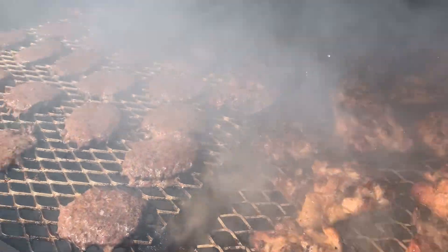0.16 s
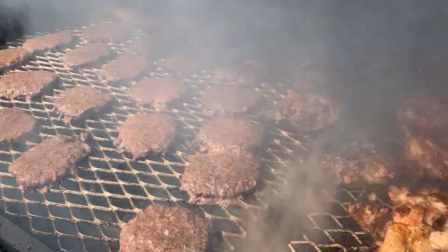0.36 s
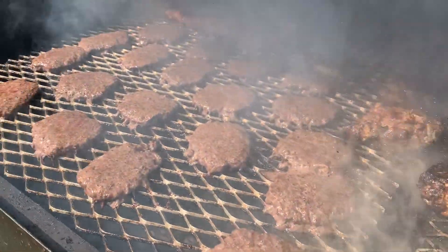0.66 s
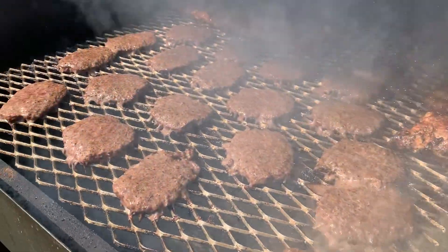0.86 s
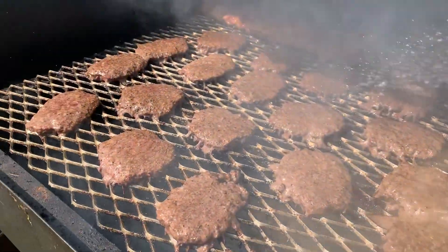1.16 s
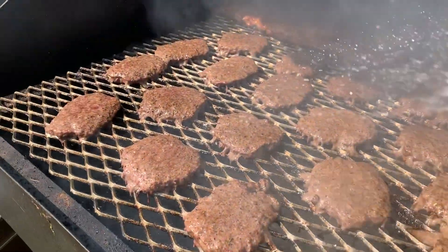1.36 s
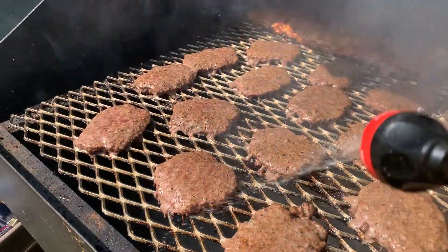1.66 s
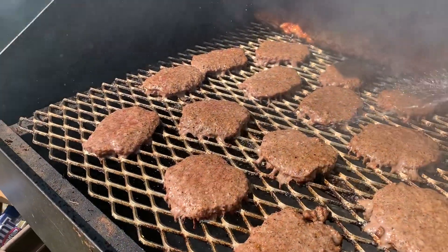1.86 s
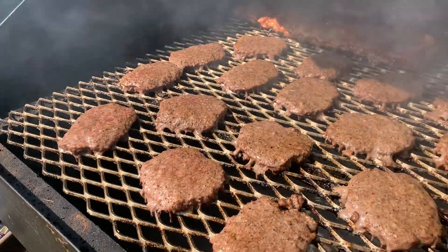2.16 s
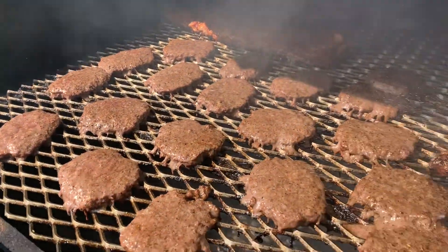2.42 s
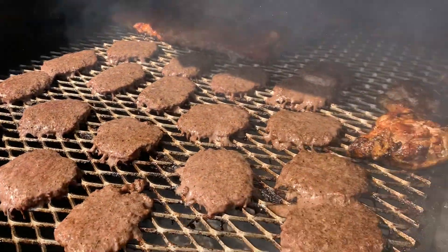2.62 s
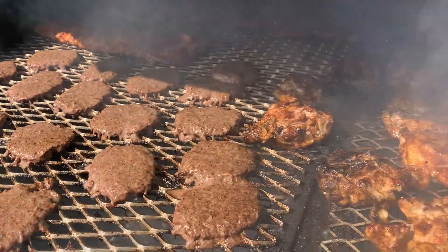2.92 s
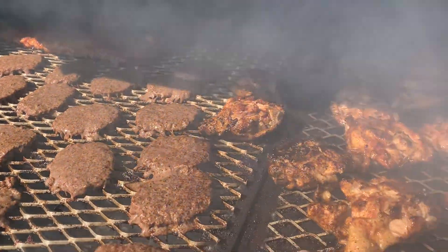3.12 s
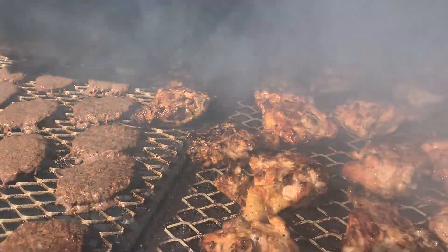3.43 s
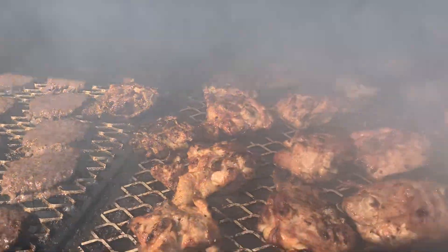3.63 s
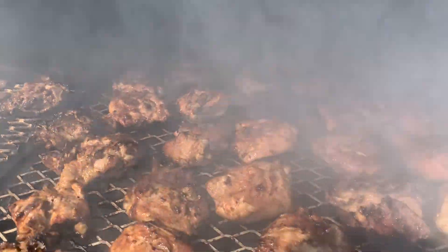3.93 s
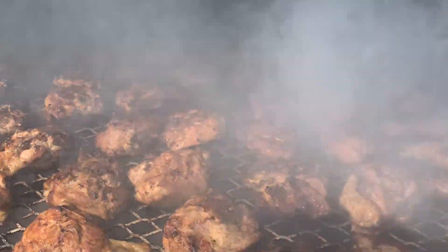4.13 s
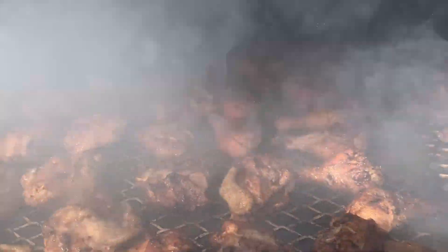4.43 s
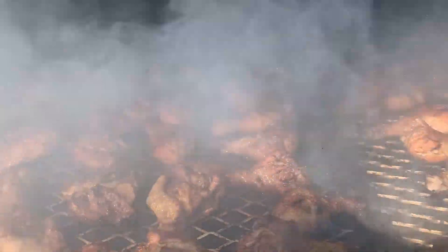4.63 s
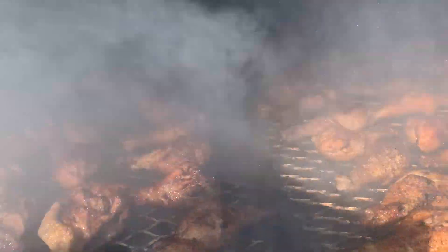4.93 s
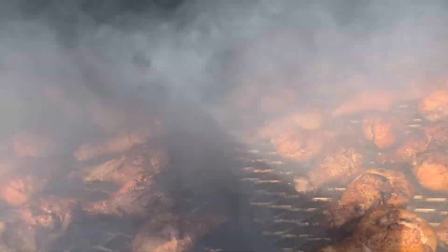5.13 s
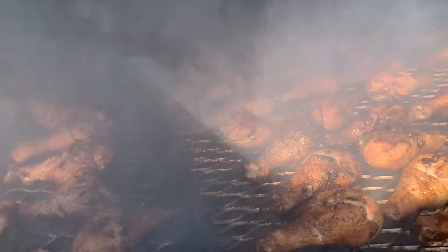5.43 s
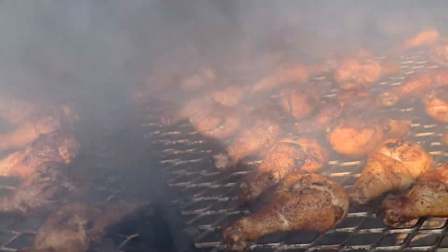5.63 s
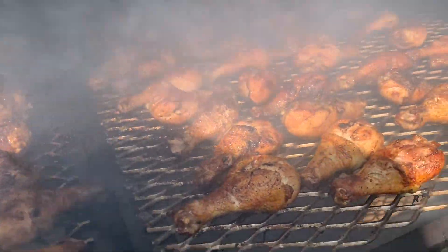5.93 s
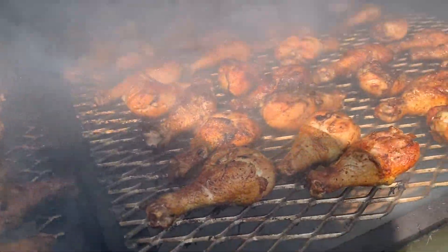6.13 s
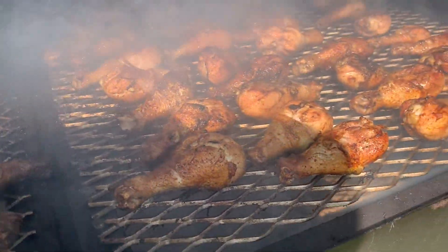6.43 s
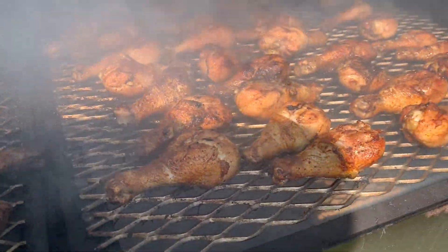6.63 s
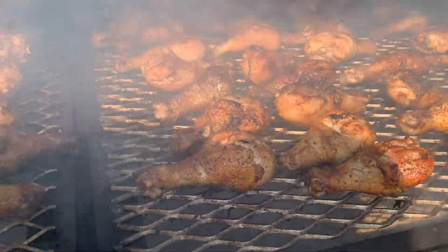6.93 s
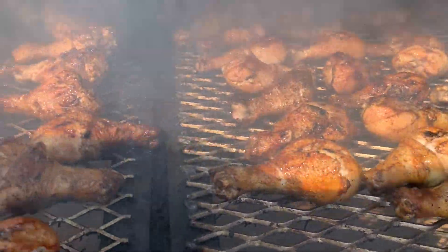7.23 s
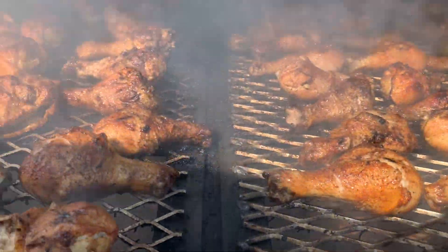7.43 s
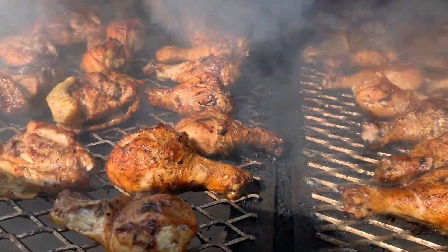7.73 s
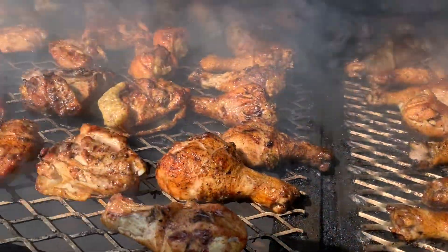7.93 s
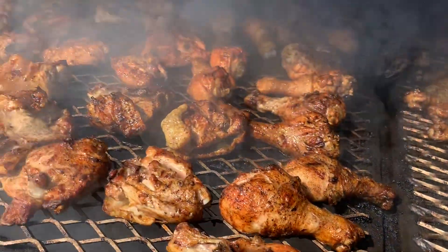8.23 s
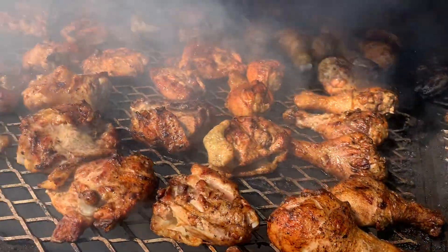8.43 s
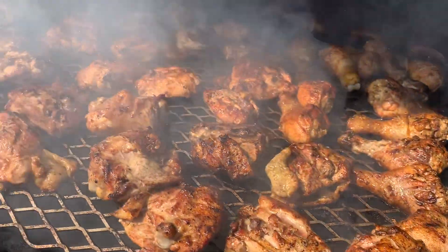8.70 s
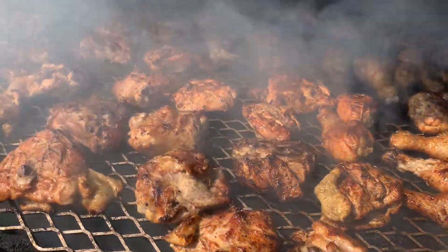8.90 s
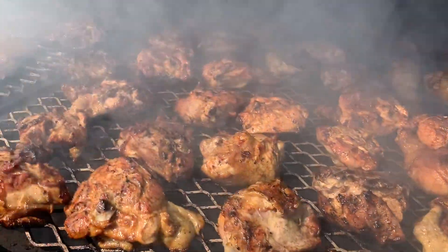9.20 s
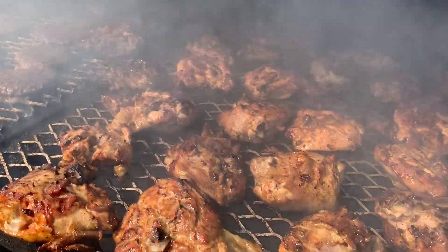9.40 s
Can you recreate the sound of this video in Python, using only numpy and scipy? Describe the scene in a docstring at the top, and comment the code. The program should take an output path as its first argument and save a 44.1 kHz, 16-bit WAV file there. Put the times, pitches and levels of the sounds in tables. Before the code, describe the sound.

Outdoors, very close to burgers and chicken on a wide charcoal grill, a dense bright sizzle runs throughout: countless tiny bubble bursts over airy hiss. It is loudest in the first second, surging in rapid squirts of steam at about 0.5, 0.9 and 1.1 s, then falls near 2 s. Smaller swells follow between 2.1 and 3.3 s, with a clear hiss at 4.5 s. From 5 to 7.4 s it is calmer, then rises modestly around 8.5 s. Dull, whistling bands of steam drift through it. Sharp, tiny fat spits click at 3.3, 4.9 and 5.7 s, clustering most strongly at 7.1-7.6 s and continuing sparsely. Soft grill knocks fall near 2.8, 5.1, 5.5, 6.4 and 8.5 s. Two faint motors hum low, swelling around 3, 7.5 and 9 s. Light wind rumbles and thumps the moving handheld stereo microphone, especially around 2.8, 7.4, 8.3 and 9 s.

```python
"""First comes a dense, bright sizzle: meat on a wide charcoal grill in the open, many bubble bursts over hiss.
Sprayed liquid flashes to steam on the hot mesh in quick swells; jets of steam, gliding bands of noise, whistle
dully. Fat spits in ringing clicks and short noise bursts tap the grill. Two small motors nearby hum as sine
lines, and a light wind buffets the hand-held microphone pair with low noise and short thumps. The pair swings
along the grill, so the sizzle reaches the left microphone by a changing detour."""
import sys
import numpy as np
from scipy import signal
from scipy.fft import rfft, irfft, next_fast_len
from scipy.io import wavfile
from scipy.ndimage import uniform_filter1d, map_coordinates

SR = 44100
rng = np.random.default_rng(int(sys.argv[2]) if len(sys.argv) > 2 else 0)


def generate_wav(signal):
    """Clip the signal to [-1, 1] and save it as 16-bit WAV at the path in sys.argv[1]."""
    frames = np.transpose(np.atleast_2d(signal))
    scaled = np.clip(frames, -1, 1) * 32767
    pcm = np.round(scaled).astype(np.int16)
    wavfile.write(sys.argv[1], SR, pcm)


N = 421596   # length [samples]
LEFT_RIGHT_HALVES = np.array([[.5], [-.5]])   # splits a left-minus-right level between the microphones


def amp(db):
    """Decibels to gain."""
    return 10 ** (np.asarray(db) / 20)


def rms_one(x):
    """Scale to unit rms."""
    return x / np.sqrt(np.mean(x ** 2) + 1e-20)


def in_time(rows):
    """Table columns as curves, one value a sample."""
    s, *columns = np.transpose(rows)
    return [np.interp(np.arange(N) / SR, s, column) for column in columns]


def at_hz(points, hz):
    """Read a table on a log-frequency axis."""
    table_hz, values = np.array(points)[:, 0], np.array(points)[:, 1]
    return np.interp(np.log(hz), np.log(table_hz), values)


def humps(crests_s, heights, rise_s, fall_s):
    """Sum of bell-shaped swells, one value a sample."""
    t = np.arange(0, N + 64, 64) / SR
    since = t[:, None] - crests_s
    width_s = np.where(since < 0, rise_s, fall_s)
    bells = np.exp(-(since / width_s) ** 2) @ heights
    return np.interp(np.arange(N) / SR, t, bells)


def drift(rate_hz):
    """Slow chance: coarse noise through a double one-pole low-pass; spread 1."""
    r = np.exp(-2 * np.pi * rate_hz * 40 / SR)   # one coarse step is 40 samples
    coarse = rng.standard_normal(N // 40 + 2002)
    slow = signal.lfilter([1], [1, -2 * r, r * r], coarse)[2000:]
    return np.interp(np.arange(N) / 40, np.arange(len(slow)), rms_one(slow))


def ring(x, hz, t60):
    """A resonance: a unit click sets a sine of starting height 1 ringing, 60 dB down after t60 seconds."""
    r, w = amp(-60 / (t60 * SR)), 2 * np.pi * hz / SR
    return signal.lfilter([0, np.sin(w)], [1, -2 * r * np.cos(w), r * r], x + 1e-18)


# centres of seething, fizz, steam and mist: [Hz]
LAYER_CENTRES = [1400, 4200, 9500, 14000]


def sizzle():
    """Bubbles on the hot mesh seethe, fizz and steam: half-octave bands swell and flicker separately."""
    size = next_fast_len(N)
    hz = np.maximum(np.fft.rfftfreq(size, 1 / SR), 1)
    pair = sizzle_at_microphones(size, hz)
    still_rms = np.sqrt(2 * np.sum(abs(pair) ** 2) / len(pair)) / size
    pair = pair.astype(np.complex64)
    swell_db, steam_mean_db = sizzle_swells()
    together = drift(11.0)
    low_flicker_db = 4.5   # in the lowest band; larger bubbles come fewer, so low bands flicker more
    octaves = np.log2(hz / 300)
    layer_octaves = np.log2(np.array(LAYER_CENTRES) / 300)
    out = 0
    for k in range(13):   # overlapping half-octave bands that sum to one
        share = np.clip(1 - abs(2 * octaves - k), 0, 1).astype(np.float32)
        band = irfft(pair * share, size)[:, :N]
        weights = [np.interp(k / 2, layer_octaves, one_layer) for one_layer in np.eye(4)]
        patches_db = 0.37 * together + .5 * drift(20.0)
        flicker_db = amp(-2.5 * k) * low_flicker_db * drift(32)
        out = out + band * amp(weights @ swell_db + patches_db + flicker_db)
    return out * amp(steam_mean_db + 4.5) / still_rms


# swing of the microphones: (time [s], lag at the left one [ms])
SWING_LAG = [(0, .22), (.4, .27), (1.2, .34), (1.9, .4), (2.2, .385), (2.66, .29), (3.2, .23), (3.5, .21),
             (4.2, .24), (4.45, .29), (4.72, .23), (5.2, .23), (5.35, .045), (7.05, .04), (7.3, .27),
             (8.2, .27), (8.9, .31), (9.56, .34)]
# how far one spot of the grill rules the detoured sizzle, against many scattered ones: (time [s], share [0-1])
SPOT_FOCUS = [(0, .9), (.4, 1), (1.3, 1), (1.7, .75), (2.2, .9), (2.6, 1), (3.3, .95), (3.6, .3),
              (4.05, .4), (4.3, 1), (4.78, 1), (4.9, .5), (5.3, .15), (5.5, .55), (6.9, .55), (7.15, .2),
              (7.6, .85), (8.3, .85), (8.7, .7), (9, .35), (9.56, .4)]
# phase by which the housing turns the left microphone against the right: (frequency [Hz], phase [rad])
HOUSING_PHASE = [(300, 6.3), (500, 4.7), (900, 5.1), (1150, 4.8), (1450, 2.1), (1750, 1.5), (2040, .5),
                 (2060, 1.5), (2300, 1.4), (2800, .7), (4400, .5), (5500, -.6), (7300, -2.7), (7700, 0),
                 (11500, 0), (12600, -.3), (13500, -.7), (14500, -1), (16000, -1.4)]
# share of the sizzle that comes from the common stream: (frequency [Hz], likeness [0-1])
SHARED_PART = [(300, .7), (500, .45), (700, .2), (900, .4), (1150, .25), (1450, .3), (1750, .5),
               (2000, .35), (2250, .97), (3000, .96), (3600, .75), (4600, .4), (5500, .25), (7100, .2),
               (7800, .93), (9000, .97), (11500, .97), (12600, .83), (13500, .72), (14500, .66),
               (16000, .67)]
# colour of the sizzle: (frequency [Hz], relative level per Hz [dB])
SIZZLE_COLOUR = [(180, -47), (300, -17.5), (385, -24.5), (469, -23.5), (510, -18.5), (582, -22.5),
                 (988, -13.5), (1470, -12.5), (1950, -8.5), (2450, -7), (2950, -6), (3540, -6),
                 (4700, -5.5), (5400, -6.5), (6200, -6), (7090, -5.5), (8200, -4.5), (10400, -1),
                 (12300, -3.5), (14000, -1.5), (15700, -2)]
# lean of the sizzle to one side: (frequency [Hz], left minus right [dB])
SIZZLE_LEAN = [(60, 1.0), (120, 1.5), (240, 6), (480, -7.5), (950, -3.5), (1890, -1), (2400, 2),
               (3000, -0.3), (3770, 0.5), (4800, 1), (5900, 2.5), (7520, 0), (15000, 0)]
LAG_LOW_HZ, LAG_TOP_HZ = 2050, 7500   # the detour acts between these


def sizzle_at_microphones(size, hz):
    """Spectra at left and right: one shared bubble stream, detoured to the left, and a private one at each."""
    shared, left, right = (bursting(6000, 1.85, 3.1) for _ in range(3))
    lag_ms, = in_time(SWING_LAG)
    late = map_coordinates(shared, [np.arange(N) - lag_ms * SR / 1000], order=3, mode="mirror")
    focus, = in_time(SPOT_FOCUS)
    late = focus * late + np.sqrt(1 - focus ** 2) * rng.standard_normal(N)
    shared, late, left, right = (rfft(x, size) for x in (shared, late, left, right))
    detoured = (hz > LAG_LOW_HZ) & (hz < LAG_TOP_HZ)
    at_left = np.where(detoured, late, shared) * np.exp(1j * at_hz(HOUSING_PHASE, hz))
    alike = np.clip(at_hz(SHARED_PART, hz), 0, 1)
    pair = np.sqrt(alike) * np.array([at_left, shared])
    pair += np.sqrt(1 - alike) * np.array([left, right])
    colour_db = at_hz(SIZZLE_COLOUR, hz) + at_hz(SIZZLE_LEAN, hz) * LEFT_RIGHT_HALVES
    return pair * amp(colour_db) * (hz > 250)


def bursting(per_s, spread_db, hiss_db):
    """Steam bubbles burst as clicks of very uneven size, in clumps, over a smooth hiss; flat spectrum."""
    sizes = amp(spread_db * np.minimum(rng.exponential(1, N), 6)) * rng.choice([-1, 1], N)
    born = rng.random(N) < per_s * amp(2.5 * drift(40)) / SR
    return rms_one(rms_one(sizes * born) + amp(hiss_db) * rng.standard_normal(N))


# sizzle under the squirts; the mean of the steam sets the overall level, the others give only changes:
# (time [s], steam 7.5-12 kHz [relative dB], seething 0.7-2.5 kHz [relative dB], fizz 2.5-7 kHz [relative dB])
SIZZLE_LEVELS = [(0, -27, -47, -38), (.3, -24.5, -45, -37.5), (.55, -27.5, -46.5, -38),
                 (.75, -25.5, -46, -39), (.95, -28.5, -49.5, -40), (1.5, -33.5, -51, -40),
                 (1.95, -35.5, -53.5, -42.5), (2.15, -34.5, -52, -39.5), (2.8, -30.5, -48.5, -39),
                 (3.2, -30, -48, -39.5), (3.45, -32.5, -49.5, -41), (3.9, -33.5, -50.5, -39.5),
                 (4.4, -29, -48, -39.5), (5.3, -34.5, -50.5, -44), (5.85, -35.5, -51, -44),
                 (7, -35.5, -50.5, -43.5), (7.4, -34, -49, -42), (7.7, -35, -49, -42), (8.5, -31, -49, -39),
                 (9.1, -34.5, -48, -38.5), (9.56, -34, -47.5, -36)]
# the finest mist against the steam, only its changes count: (time [s], relative level [dB])
MIST_LEVEL = [(0, 0.4), (2.5, 1), (3.1, 0.5), (4.45, 1), (5, 0.5), (6.2, -1), (7.4, 0.5), (7.6, -3),
              (8.4, -1), (9.56, 2)]
# squirts of liquid flashing to steam: (crest time [s], rise before the layer's share [dB])
SQUIRT_CRESTS = [(.17, 0.5), (.54, 4), (.74, 2), (.92, 3.5), (1.12, 3), (1.32, 2.5), (2.13, 2.5),
                 (2.38, 2.5), (2.61, 2), (2.96, 1.5), (3.28, 1), (4.22, 1), (4.47, 3.5), (5.66, 0.5),
                 (6.2, 0), (7.43, 0.5), (8.64, 0)]
# how much of a squirt shows in seething, fizz, steam and mist: [factor on the dB rise]
SQUIRT_SHARES = [.45, .8, 1.01, 1.3]
SQUIRT_RISE_S, SQUIRT_FALL_S = 0.072, 0.082


def sizzle_swells():
    """Level changes of the four layers [dB] as liquid flashes to steam, and the mean of the steam level."""
    steam_db, seething_db, fizz_db = in_time(SIZZLE_LEVELS)
    mist_db = steam_db + in_time(MIST_LEVEL)[0]
    levels_db = np.array([seething_db, fizz_db, steam_db, mist_db])
    swell_db = levels_db - levels_db.mean(axis=1, keepdims=True)
    squirts_db = humps(*np.transpose(SQUIRT_CRESTS), SQUIRT_RISE_S, SQUIRT_FALL_S)
    swell_db += np.outer(SQUIRT_SHARES, squirts_db)
    return swell_db, steam_db.mean()


# jets of steam from single pieces of meat, levels before flutter and mottle: (start [s], length [s],
# first centre [Hz], last centre [Hz], level before the microphones' own part [dB], left minus right [dB])
STEAM_JETS = [(-.3, 1.93, 3980, 3462, -44.5, 0), (2.003, 1.25, 3735, 3524, -48, -2),
              (3.197, 1, 3910, 4060, -56, -4), (4.203, 1.48, 3583, 3287, -52, -4),
              (5.55, 1.9, 3600, 3050, -46, 1), (7.4, 1.22, 4380, 4345, -47.5, -5),
              (7.399, 0.99, 2950, 2977, -56, -2), (8.051, 1.21, 3200, 3774, -43.5, 0),
              (9.1, 0.67, 3430, 3220, -50, .5)]
JET_WIDTH_HZ, JET_FADE_S = 670, 0.33
JET_OWN_DB = -2   # part that each microphone hears alone, against the shared part


def steam_jets():
    """Steam leaves the meat as fluttering noise in a band whose centre glides as the pressure changes."""
    out = np.zeros((2, N))
    low = signal.butter(4, JET_WIDTH_HZ / 2, fs=SR, output="sos")
    # each stream holds two noises that modulate cosine and sine carriers
    shared, *own = signal.sosfilt(low, rng.standard_normal((3, 2, N)))
    pair = rms_one(shared + amp(JET_OWN_DB) * np.array(own))
    for start_s, length_s, first_hz, last_hz, level_db, pan_db in STEAM_JETS:
        first, last = round(start_s * SR), round((start_s + length_s) * SR)
        part = slice(max(first, 0), min(last, N))
        since = np.arange(part.start, part.stop) / SR - start_s
        glide = (last_hz - first_hz) / length_s * since ** 2 / 2
        turn = 2 * np.pi * (first_hz * since + glide)
        fade = np.clip(np.minimum(since, length_s - since) / JET_FADE_S, 0, 1)
        gain = amp(level_db + pan_db * LEFT_RIGHT_HALVES) * fade
        out[:, part] += gain * (pair[:, 0, part] * np.cos(turn) + pair[:, 1, part] * np.sin(turn))
    return out * amp(2.0 * drift(28))


# depth of small spits and lulls: (frequency [Hz], spread before the microphones' own part [dB])
MOTTLE_DEPTH = [(600, -1.2), (1200, 1.5), (2500, 2.03), (5000, 1.5), (7500, 0.87), (12000, 0.5)]


def mottle(pair):
    """Patches a few hundred Hz wide, some 40 ms long, rise and sink, partly apart at each microphone."""
    hz, _, cells = signal.stft(pair, SR, nperseg=1024)
    field = rng.standard_normal((3,) + cells.shape[1:])
    for axis, size in ((1, 5), (1, 3), (2, 3), (2, 2)):   # smooth over frequency, then over time
        field = uniform_filter1d(field, size, axis=axis)
    field = rms_one(field[0] + 0.21 * field[1:])
    field = field * at_hz(MOTTLE_DEPTH, np.maximum(hz, 1))[:, None]
    return signal.istft(cells * amp(field), SR, nperseg=1024)[1][:, :N]


# fat spitting, the loudest: (time [s], relative level before the ringing [dB])
LOUD_SPITS = [(2.8067, -19), (3.2695, -14.6), (3.2893, -14), (4.9076, -15.7), (5.6402, -19), (5.6679, -16),
              (6.2263, -15), (6.567, -17), (6.9311, -18), (7.1105, -18), (7.1958, -17), (7.24, -18),
              (7.309, -18), (7.3347, -16.5), (7.3613, -15), (7.4128, -12), (7.4245, -16.2), (7.4592, -16),
              (7.5124, -10), (7.5636, -14), (7.7009, -17), (7.7562, -17), (7.8174, -16), (7.9376, -15),
              (8.163, -16), (8.6201, -14), (8.7243, -16), (8.8158, -16.3), (8.9183, -14), (9.0843, -15),
              (9.1667, -19), (9.4228, -16), (9.5173, -17)]
SMALL_SPITS, SMALL_SPIT_DB = 60, -24   # number of fainter ones, and the lowest relative level among them


def spits():
    """Fat bursts with a sharp crack that rings briefly near 12 kHz, a faint short spatter behind it."""
    clicks = np.zeros(N + 400)
    chance = rng.random((SMALL_SPITS, 2))
    small = [(when * N / SR, SMALL_SPIT_DB + 5 * size) for when, size in chance]
    every_spit = LOUD_SPITS + small
    fade = np.exp(-np.arange(400) / SR / .003)
    spatter = rng.standard_normal((len(every_spit), 400)) ** 3 * fade * .025
    spatter[:, 0] = 1.8   # the crack itself
    for (s, db), tail in zip(every_spit, spatter):
        i = round(s * SR)
        clicks[i:i + 400] += amp(db) * tail
    high = signal.butter(2, 6500, "high", fs=SR, output="sos")
    return signal.sosfilt(high, ring(clicks[:N], 12000, .0008))


# soft knocks on the grill: (time [s], peak before the lean to the right [dB], pitch [Hz])
GRILL_KNOCKS = [(2.781, -40, 847), (2.8, -38, 330), (5.118, -40, 1070), (5.494, -37, 1040),
                (6.446, -33, 1100), (8.477, -34.5, 900), (8.582, -34, 1000), (8.822, -39, 1083)]
KNOCK_BURST_S, KNOCK_TAIL_S, KNOCK_TAIL_DB = 0.0025, 0.02, -7
KNOCK_TICK_DB = -8   # against the ring at the pitch


def knocks():
    """Taps: a few ms of noise with a fainter tail, rung briefly at each pitch and in a broad tick above it."""
    out, t = np.zeros(N), np.arange(3000) / SR
    fade = np.exp(-t / KNOCK_BURST_S) + amp(KNOCK_TAIL_DB) * np.exp(-t / KNOCK_TAIL_S)
    bursts = rng.standard_normal((len(GRILL_KNOCKS), len(t))) * fade
    for (s, db, pitch_hz), burst in zip(GRILL_KNOCKS, bursts):
        body = rms_one(ring(burst, pitch_hz, .002))
        tick = rms_one(ring(burst, 2.2 * pitch_hz, .001))
        tap = body + amp(KNOCK_TICK_DB) * tick
        i = round(s * SR)
        out[i:i + len(t)] += amp(db) * tap / abs(tap).max()
    return out * amp([[-1.2], [1.2]])


MOTOR_HZ = 127.35
# lines of the steady motor: (multiple of MOTOR_HZ, left minus right [dB], resting rms level [dB])
MOTOR_LINES = [(2, 6.5, -74), (3, 9.5, -73.5), (4, -2, -72), (6, -1, -69), (7, 0.5, -67), (8, 1, -67),
               (9, 7, -76)]
# a line stands out for a while: (crest time [s], half length [s], multiple of MOTOR_HZ, rise [dB])
MOTOR_SWELLS = [(.5, 0.55, 3, 3.5), (.5, .5, 8, 4), (2.6, 0.54, 3, 8), (2.9, 0.18, 2, 19), (3, 0.52, 8, 6),
                (3.9, 0.44, 2, 10), (4.3, 0.98, 3, 6), (5.5, 0.54, 4, 4), (6.1, 0.7, 3, 4.5),
                (6.505, 0.4, 7, 9.5), (6.8, 0.89, 4, 12), (6.9, 0.74, 8, 6.5), (7.45, .2, 4, 4),
                (7.5, 0.22, 2, 11), (9, 1.1, 3, 13.5), (9, 1.1, 2, 11), (9.4, 0.89, 4, 13.5)]


def steady_motor():
    """A motor nearby at constant speed: thin lines whose strengths change as the microphones move."""
    t, out = np.arange(N) / SR, 0
    crest_s, half_s, which, rise_db = np.transpose(MOTOR_SWELLS)
    for multiple, pan_db, rest_db in MOTOR_LINES:
        own_rise_db = rise_db * (np.round(which) == round(multiple))
        level_db = rest_db + humps(crest_s, own_rise_db, half_s, half_s) + 2.6 * drift(3.3)
        quarter_apart = np.array([[0], [1 / 4]])   # cycles, left and right microphone
        phase = 2 * np.pi * (round(multiple) * MOTOR_HZ * t + rng.random() + quarter_apart)
        out = out + amp(level_db + pan_db * LEFT_RIGHT_HALVES) * np.sin(phase)
    return np.sqrt(2) * out


# speed of the second motor before its small wander: (time [s], first line [Hz])
DRONE_PITCH = [(0, 133.2), (3.2, 134.6), (4.3, 137.4), (6.2, 141), (7.6, 141.8), (9.56, 140.7)]
# it comes through: (crest time [s], half length [s], rise of the first line [dB], rise of the octave [dB])
DRONE_RISES = [(.7, 1.1, 19.5, 0), (2.493, 0.47, 11.5, 1.5), (2.903, 0.59, 17.5, 14.5),
               (4.25, 0.18, -2, 12.5), (7.55, 0.52, 21.5, 6.5), (7.56, 0.082, -1, 11), (9, 0.98, 15.5, 8.5)]
DRONE_REST_DB, DRONE_OCTAVE_REST_DB = -75.5, -71   # rms, before the slight lean to the left


def changing_motor():
    """A second motor nearby whose speed wanders: a sine and its octave, swelling at times."""
    hz, = in_time(DRONE_PITCH)
    crest_s, half_s, first_rise_db, octave_rise_db = np.transpose(DRONE_RISES)
    turn = 2 * np.pi * np.cumsum(hz + 0.754 * drift(3.4)) / SR
    first_db = DRONE_REST_DB + humps(crest_s, first_rise_db, half_s, half_s)
    octave_db = DRONE_OCTAVE_REST_DB + humps(crest_s, octave_rise_db, half_s, half_s)
    drone = amp(first_db) * np.sin(turn) + amp(octave_db) * np.sin(2 * turn)
    return np.sqrt(2) * drone * amp([[.8], [-.8]])


# wind rumble between buffets: (time [s], relative level [dB])
WIND_LEVEL = [(0.0, -50.5), (0.4, -51), (0.67, -56), (1.81, -58), (2.82, -52), (3.43, -57.5), (4.34, -52),
              (5.11, -55), (9.45, -51.5), (9.56, -48)]
# colour of the rumble, used below 700 Hz: (frequency [Hz], relative level per Hz [dB])
RUMBLE_COLOUR = [(15, -37), (25, -38), (48, 6.5), (70, 3.5), (205, -8.5), (275, -9.5), (330, -21),
                 (384, -10.5), (448, -18), (508, -29.5), (700, -17.5), (910, -50), (1540, -120)]
# single buffets of wind: (start [s], peak before the lean to the left [dB], pitch [Hz], change of rumble [dB])
WIND_BUFFETS = [(.2, -51, 65, -3), (1.786, -36, 86.1, 6), (2.21, -35, 89, 7), (2.644, -51, 135, 4),
                (2.7, -46, 75, 4.5), (2.78, -39, 70, 5), (2.81, -37, 190, 3), (2.851, -32, 210, 2),
                (3.065, -33, 86.1, 10), (3.63, -48, 65, 6), (3.964, -49, 67.3, 2), (4.33, -37, 65, 5),
                (4.551, -41, 61.5, -1), (4.633, -36, 60.7, 9), (5.176, -42, 61.9, 2),
                (5.667, -37, 54.6, -1), (6.029, -45, 59.8, 0), (6.505, -38, 64.6, -3),
                (7.413, -32.5, 94.2, 5), (7.43, -32, 200, -3.5), (7.561, -37, 75.4, 7.5),
                (7.982, -34, 69, 6), (8.05, -37, 90, 2), (8.276, -30, 104, 8), (8.289, -32, 190, -2),
                (9.009, -31, 65.3, 3), (9.087, -41, 65, -3), (9.347, -45, 69.6, 3)]
GUST_LAG_S, GUST_RISE_S, GUST_FALL_S = 0.022, 0.021, 0.075


def wind():
    """Lumpy low noise, mostly common to both microphones, over a steady outdoor murmur, plus buffets."""
    size = next_fast_len(N)
    hz = np.maximum(np.fft.rfftfreq(size, 1 / SR), 1)
    colour = amp(at_hz(RUMBLE_COLOUR, hz)) * (hz < 700)
    gusty = 1 / (1 + (hz / 170) ** 4)   # gusts move only the lowest part
    level_db, = in_time(WIND_LEVEL)
    start_s, *_, rise_db = np.transpose(WIND_BUFFETS)
    gusts_db = humps(start_s + GUST_LAG_S, rise_db, GUST_RISE_S, GUST_FALL_S)
    parts = []
    for gain_db, lumps_db in ((2.0, 1.95), (-10, 2.7)):   # common part, then opposed part
        noise = rfft(rng.standard_normal(size)) * colour
        low = irfft(noise * gusty, size)[:N]
        murmur = irfft(noise * (1 - gusty), size)[:N]
        swell = amp(level_db - level_db.mean() + gusts_db + lumps_db * drift(6.1))
        parts.append(amp(level_db.mean() + gain_db) * (low * swell + murmur) / low.std())
    common, opposed = parts
    common = common + buffets()
    return common * amp(LEFT_RIGHT_HALVES) + opposed * [[1], [-1]]


def buffets():
    """Each buffet is a smooth push of some 7 ms that rings for a cycle or two at its pitch."""
    out = np.zeros(N)
    push = np.zeros(4000)
    push[:300] = np.hanning(300)
    for s, db, pitch_hz in np.array(WIND_BUFFETS)[:, :3]:
        thump = ring(push, pitch_hz, 4.5 / pitch_hz)
        i = round(s * SR)
        out[i:i + 4000] += amp(db) * (thump / abs(thump).max())[:N - i]
    return out


def scene():
    """All sources at the two microphones."""
    steaming = mottle(sizzle() + steam_jets())
    return steaming + spits() + knocks() + steady_motor() + changing_motor() + wind()


def record(dry):
    """The lowest bass is rolled off and the top is cut steeply."""
    bass_cut = signal.butter(3, 33, "high", fs=SR, output="sos")
    top_cut = signal.ellip(14, .3, 75, 15750, fs=SR, output="sos")   # ripple and stop depth [dB], edge [Hz]
    return signal.sosfilt(top_cut, signal.sosfilt(bass_cut, dry))


dry = scene()
out = record(dry)
generate_wav(out)
```